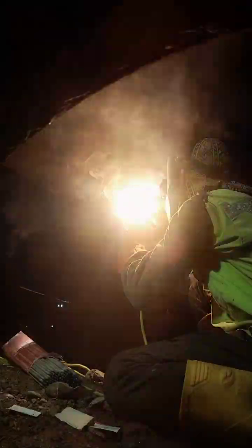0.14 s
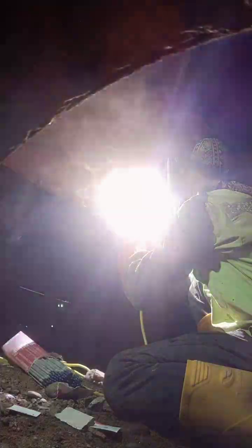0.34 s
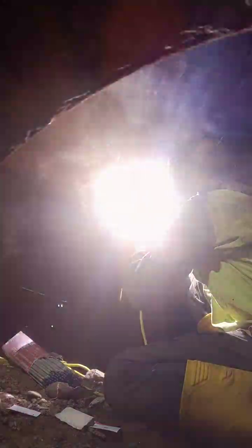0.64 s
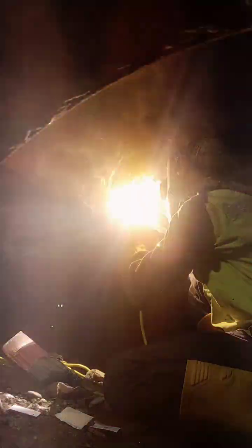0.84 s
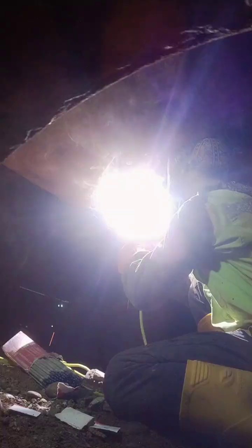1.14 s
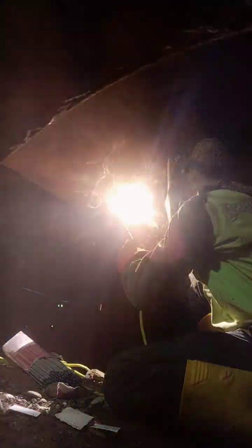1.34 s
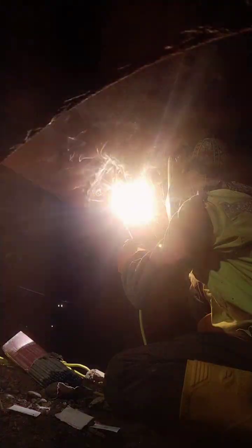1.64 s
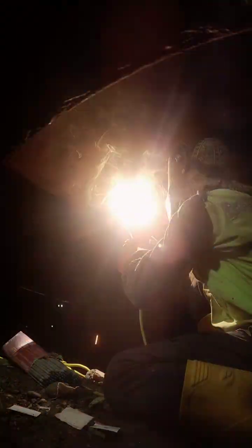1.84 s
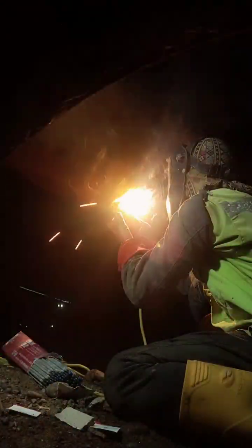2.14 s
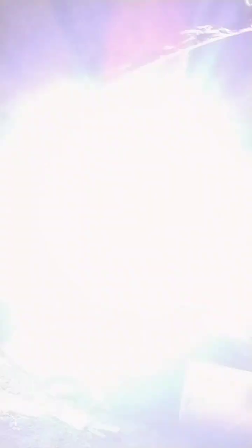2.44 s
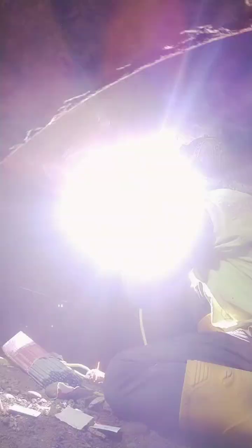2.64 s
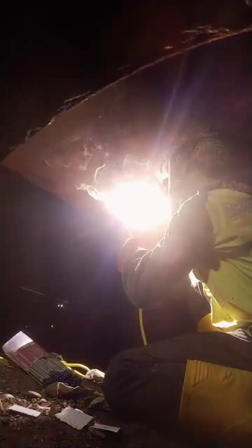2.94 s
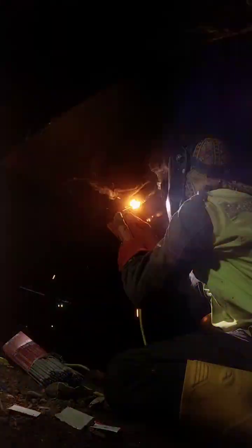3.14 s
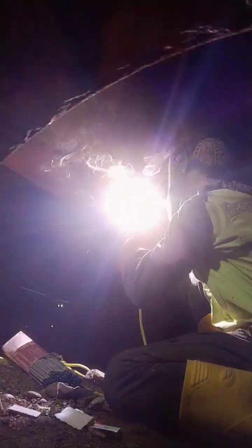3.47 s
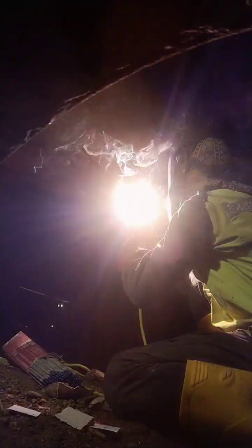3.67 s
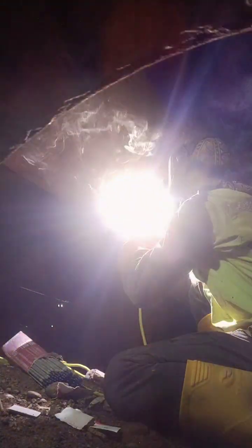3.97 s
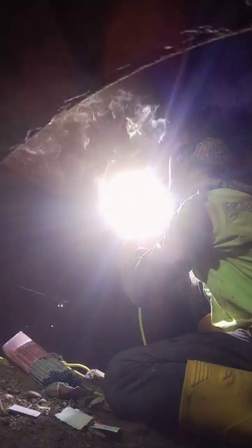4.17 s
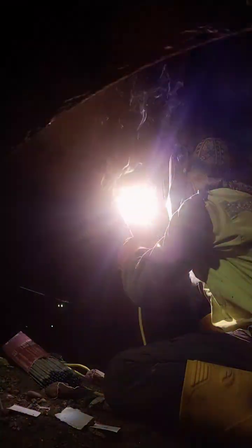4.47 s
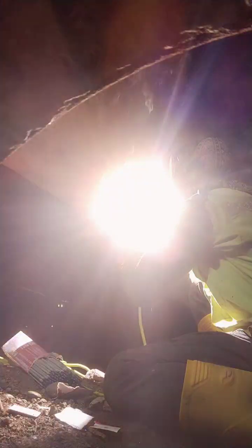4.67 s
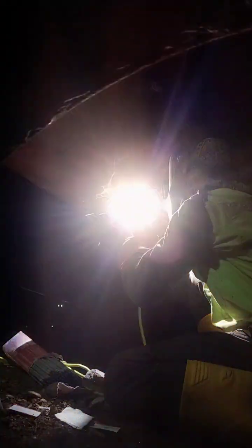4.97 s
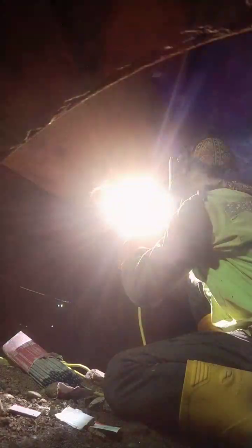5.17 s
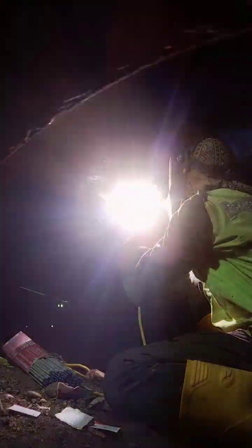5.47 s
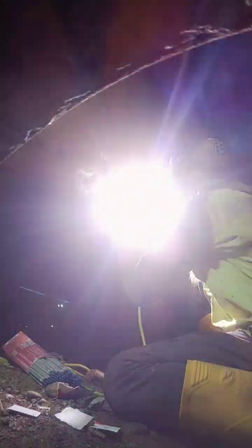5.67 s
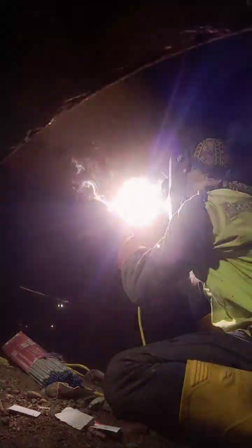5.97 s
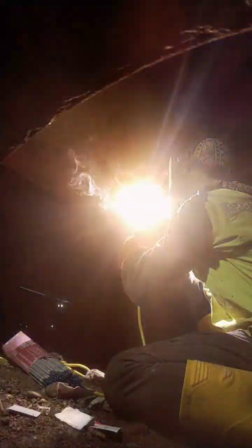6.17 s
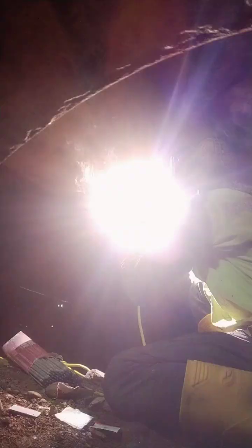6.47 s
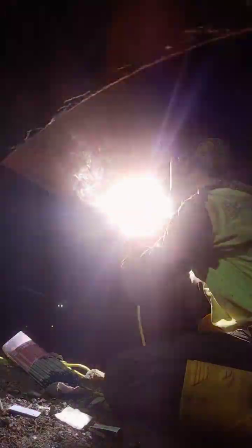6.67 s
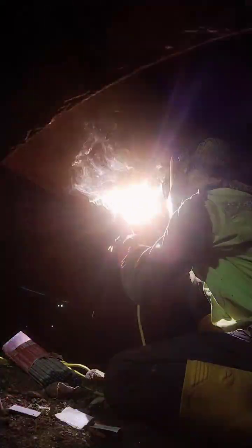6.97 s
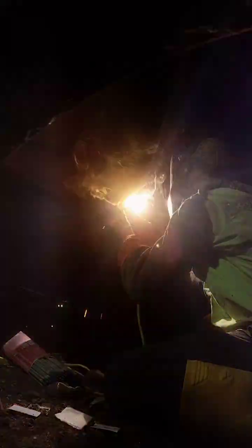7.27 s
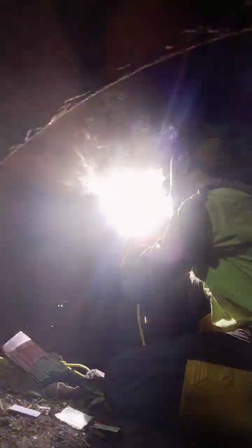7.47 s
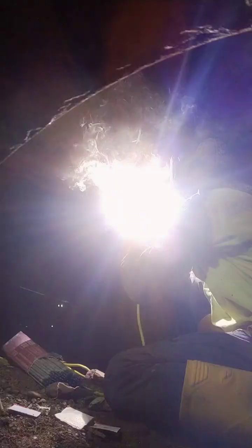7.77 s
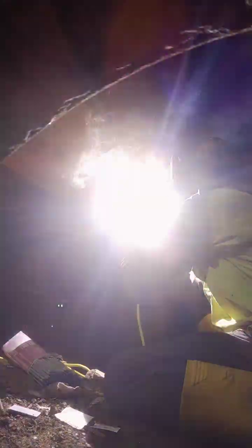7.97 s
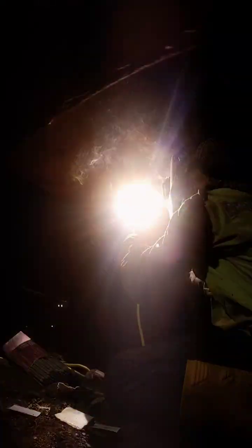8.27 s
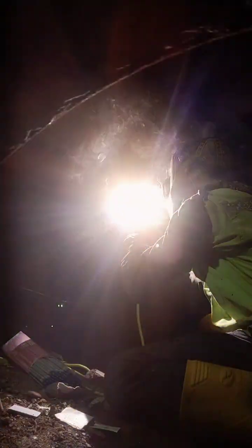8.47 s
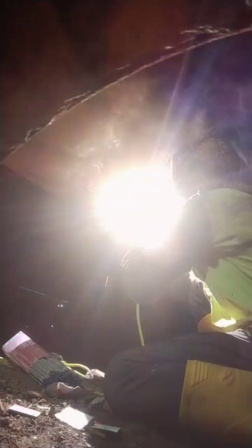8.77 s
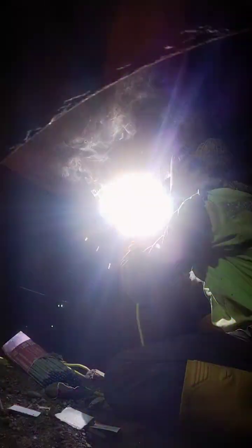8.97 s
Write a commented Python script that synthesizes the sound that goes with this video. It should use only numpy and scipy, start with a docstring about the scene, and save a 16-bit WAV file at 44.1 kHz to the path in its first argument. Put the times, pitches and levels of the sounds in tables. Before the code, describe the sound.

A stick welding arc sizzles and crackles fiercely against a large steel pipe, flaring in bursts with sharp pops over a low hollow rumble.

```python
"""Outdoors, close to a large steel pipe: a stick electrode burns on its seam.
The arc sizzles in countless tiny spatter bursts (shaped noise and clicks) and roars into the hollow
pipe (deeper noise with resonances). A few times a second a molten drop bridges the gap with a pop
(a click, often with a push of air), and most drops choke the arc for a moment. At listed times it
flares up from its simmer. Thin whistles, soft whoomps and a low background complete the scene."""
import sys
import numpy as np
from scipy import signal
from scipy.fft import rfft, irfft
from scipy.io import wavfile
from scipy.ndimage import uniform_filter1d

SR = 44100
rng = np.random.default_rng(int(sys.argv[2]) if len(sys.argv) > 2 else 0)


def bounce(signal):
    """Save signal as a 16-bit WAV file at the path given by the first command-line argument."""
    frames = np.transpose(np.atleast_2d(signal))
    limited = np.clip(frames, -1, 1)
    pcm = np.round(limited * 32767).astype(np.int16)
    wavfile.write(sys.argv[1], SR, pcm)


N = 402191  # length in samples

# The arc simmering between flares, levels before each layer's own trim: start_s, sizzle_db, gas_db
SIMMER_LEVELS = [(0, -40, -57.5), (1.2, -40, -54.5), (1.6, -37, -55.5), (2.3, -43.5, -50.5),
                 (2.8, -36.5, -55.5), (4.4, -41.5, -57.5), (4.8, -36, -52.5), (5.7, -42, -57),
                 (6.3, -37, -55), (7.22, -34.5, -49), (7.33, -41.5, -56.5), (7.7, -39, -54),
                 (8.1, -39, -52), (8.35, -39.5, -52.5), (9.1, -39, -57.5)]
# The arc flaring up, same levels: start_s, length_s, sizzle_db, gas_db, swell_db (from start to end)
ARC_FLARES = [(0, 0.079, -33.5, -46, 6), (.282, 0.081, -32, -46.5, -0.5), (0.461, .088, -35, -49, -1),
              (0.637, .178, -36, -51, 1), (0.942, 0.13, -32.5, -48, 2), (1.264, 0.1295, -35.5, -50.5, 8.5),
              (1.495, .04, -29.5, -45.5, 3.5), (1.621, 0.23, -32, -47.5, 2), (1.975, 0.24, -35, -45, 2.5),
              (2.461, 0.25, -35.5, -51.5, -3.5), (2.833, 0.12, -37, -51, 6.5),
              (3.064, 0.088, -40.5, -54, 9), (3.278, 0.085, -32, -48.5, -3), (3.439, 0.16, -36.5, -53.5, 6),
              (3.722, 0.049, -34, -48, -1), (3.849, 0.064, -36, -52.5, 1), (4.03, 0.079, -33, -49.5, -10.5),
              (4.205, 0.15, -36, -51, -2), (4.557, 0.18, -31.5, -48, 7.5),
              (4.854, 0.098, -30.5, -46.5, -3.5), (5.155, 0.14, -37, -50.5, -7),
              (5.395, 0.13, -37, -52, 3.5), (5.72, 0.11, -33.5, -50, 0.5), (5.921, .036, -37.5, -48.5, 0),
              (6.058, .14, -33.5, -46, -2.5), (6.539, 0.2, -36.5, -50.5, -2.5), (6.83, 0.11, -40, -55, 3.5),
              (7.027, 0.14, -31, -44, 2.5), (7.387, 0.22, -35, -51, 0), (7.824, 0.049, -33, -50.7, 4),
              (7.954, 0.073, -32, -45, -1.5), (8.217, 0.073, -31.5, -48.5, -4.5),
              (8.41, .031, -29.5, -46.5, 11), (8.523, 0.17, -33.5, -47, 6.5),
              (8.813, 0.11, -29.5, -44, 1.5)]
# Drops bursting in the gap: time_s, snap_db, tick_db (treble, before sharpening),
# push_full_scale (start of the slow air swing), choke_db (only values above 0 choke the arc)
DROP_POPS = [(0.0922, -36, -10, 0, 6.5), (0.198, -18.5, -8, 0.00026, 14.5), (0.3752, -24, -4, -0.0012, 2),
             (0.55, -23, -3, -0.0011, 0.5), (0.5795, -22, -1.5, -0.006, 5.5), (0.8132, -29, -8, 0.0021, 3),
             (0.8533, -28, -12, 0, -0.5), (1.0847, -24, -7, -0.0023, 9), (1.4065, -27, -9, -0.00069, 10.5),
             (1.8888, -38, -7.5, 0, 8.5), (2.3816, -32, -4.5, -0.005, 4), (2.7331, -15, -5, 0.067, 14),
             (2.8007, -31, -7, 0.0038, 4), (2.9991, -23, -3.5, 0.005, 6), (3.179, -18, -7, -0.0007, 5),
             (3.367, -13.5, -6, -0.0062, 11.5), (3.6321, -15.5, -4.5, 0.01, 13),
             (3.7695, -35, -4.5, -0.0019, 5), (3.9445, -19, -5.5, 0.0017, 4.5),
             (4.1046, -15.5, -7, 0.021, 15), (4.3727, -32, -7, 0, 4), (4.4697, -19.5, -9, 0.0015, 6.5),
             (4.9754, -26, -6, -0.0018, 3), (5.0692, -9, -7, -0.024, 11), (5.3156, -17, -4.5, 0.025, 11.5),
             (5.5606, -8.5, -4.5, -0.021, 4), (5.6387, -18.5, -8, -0.0021, 3),
             (5.8398, -21, -5, -0.0037, 5), (5.9677, -15.5, -9, 0.01, 12.5), (6.2665, -21, -1, -0.00092, 2),
             (6.452, -16.5, -1.5, 0.00062, 8), (6.7346, -18.5, -7, -0.0083, 16.5), (6.8002, -31, -14, 0, 3),
             (6.9282, -28, -11, 0, 15), (7.6515, -18, -4.5, -0.0012, 6), (7.871, -20, -8, 0.046, 20),
             (8.4424, -12, -18, -0.013, 12.5), (8.72, -17.5, -4.5, -0.0077, 11),
             (8.9613, -22, -2, -0.0044, -5), (9.019, -15, -6.5, -0.011, 9)]
# The loudest bursts of spatter, before sharpening: time_s, energy_db
LOUD_CRACKS = [(0.6379, -7.5), (0.6692, -4), (0.7977, -3), (1.1746, -9), (1.1943, -6.5), (1.3773, -7),
               (1.5228, -4), (1.6295, -5), (1.7667, -5), (1.9939, 1.5), (2.3003, -7), (2.3227, -6),
               (2.637, -5), (2.906, -0.5), (3.075, -8.5), (3.1417, -3), (3.1592, -2), (3.4358, -14),
               (3.6111, -3), (3.7975, -6), (3.9159, -7), (4.038, -13), (4.2904, -3.5), (4.454, -10),
               (4.7025, -1), (4.804, -6), (4.9654, -3), (5.2343, -2), (5.2681, -5.5), (5.4826, -4),
               (5.7327, 0), (5.9526, -3), (6.1865, -6), (6.2063, -5.5), (6.588, 2), (6.8968, -6),
               (7.0802, 4), (7.162, 0), (7.3077, -3.5), (7.5822, -2.5), (7.6421, -2.5), (7.7353, -5.5),
               (7.8223, -8), (8.0055, -4), (8.125, -7), (8.2442, -3), (8.3183, -1.5), (8.6958, -2),
               (8.839, 2), (8.9375, -5)]
# Thin whistles driven by the arc, before flutter: start_s, length_s, pitch_hz, level_db (against the sizzle)
ARC_WHISTLES = [(0.93, 0.34, 4130, -14.5), (1.22, 0.26, 4180, -22), (1.335, 0.24, 3390, -14.5),
                (1.6, 0.3, 3420, -25), (1.3, 0.6, 4360, -24), (1.95, 0.3, 4405, -22)]
# Gas whoomps as the arc lights again, before roughness and smoothing:
# start_s, pressure_full_scale, length_s
GAS_WHOOMPS = [(2.88, -0.12, 0.078), (7.95, -0.09, 0.15), (7.973, -0.095, 0.03)]

# Tone colours. Only the differences between levels matter, because shaped() sets the loudness.
# Sizzle: pitch_hz, level_db (per Hz)
SIZZLE_COLOUR = [(300, -38.5), (2300, -31.5), (4000, -17), (6800, -27.5), (7600, -13.5), (8300, -16),
                 (8900, -26), (10200, -22.7), (12400, -14.5), (14000, -12.5), (15400, 0.5), (16000, -7.5)]
# Peaks and notches that the nearby steel puts into the sizzle: pitch_hz, width_hz, height_db
STEEL_REFLECTIONS = [(2336, 99, 4.5), (2918, 169, 4.4), (3060, 116, -7.8), (3413, 64, 6.5),
                     (3481, 50, -6.0), (3719, 304, -10.8), (4429, 197, -9.3), (5246, 95, -4.1),
                     (6105, 399, 7.9), (6129, 117, -11.0), (6766, 212, 7.4), (6959, 50, -7.3),
                     (7188, 64, -4.1), (8645, 67, -4.7), (9287, 57, -4.7), (9554, 294, 6.0),
                     (9725, 160, -8.0), (10082, 111, -10.6), (10679, 93, -9.4), (10909, 164, 4.9),
                     (11536, 201, -5.9), (12688, 143, 4.9), (12943, 114, -5.5), (13400, 118, -6.4),
                     (13851, 62, -4.2), (14536, 75, -4.6)]
# Roar of the gas: pitch_hz, level_db (per Hz)
ROAR_COLOUR = [(60, -8.5), (200, -14), (290, -3), (470, 1.5), (700, -1), (1000, -4.5), (1500, -12.5),
               (2500, -16.5), (6000, -22.5)]
# Rumble in the pipe: pitch_hz, level_db (per Hz)
RUMBLE_COLOUR = [(10, -7.5), (30, 1.5), (60, -2.5), (110, -7.5), (165, -11.5), (235, -12.5), (280, -26.5),
                 (1000, -50.5)]
# Air resonances of the pipe: pitch_hz, width_hz, height_db
PIPE_RESONANCES = [(33, 10, 4), (52, 8, 5), (70, 7, 5), (86, 14, -3), (104, 9, 8), (126, 10, 3),
                   (186, 12, 3)]
# Snap of a drop: pitch_hz, level_db (per Hz)
SNAP_COLOUR = [(60, 7), (300, -3.5), (800, -0.5), (1700, 1), (2800, -0.5), (4200, -7), (6000, -20),
               (12000, -20)]
# Steady background of the site: pitch_hz, level_db (per Hz)
SITE_COLOUR = [(10, -18), (35, 3.5), (100, -8), (200, -11), (300, -22.5), (700, -26.5), (2000, -36),
               (8000, -41), (16000, -72)]

SITE_DB = -56  # background loudness
CUTOFF_HZ = 15850  # top of the treble
FLASH_DB, FLASH_S = 2, 0.079  # every flare lights with a brief overshoot
RECOVER_S = 0.11  # time the arc needs to come back after a drop has choked it
GAS_CHOKE_SHARE = 0.76  # the gas roar sinks less than the sizzle
DROP_SHORT_S, DROP_SHORT_DB = 0.0083, -7.5  # a drop shorts the arc just before it bursts
TIME = np.arange(N) / SR  # seconds
GRID_HZ = np.maximum(np.arange(16385) * SR / 32768, 1)


def from_db(db):
    """Turn decibels into a gain."""
    return 10 ** (np.asarray(db) / 20)


def colour(spectrum, resonances=()):
    """Gain over frequency: a broad shape with peaks and notches on it."""
    hz, db = np.transpose(spectrum)
    shape_db = np.interp(np.log(GRID_HZ), np.log(hz), db)
    for centre_hz, width_hz, height_db in resonances:
        offset = 2 * (GRID_HZ - centre_hz) / width_hz
        shape_db = shape_db + height_db / (1 + offset ** 2)
    return from_db(shape_db)


def shaped(x, gain, band):
    """Filter that never sounds early (minimum phase); unit white noise gets rms 1 inside the band (Hz)."""
    inside = (GRID_HZ > band[0]) & (GRID_HZ < band[1])
    band_rms = np.sqrt(np.mean(gain ** 2 * inside))
    # folding the cepstrum packs the response as early as possible
    cepstrum = irfft(np.log(gain / band_rms))
    half = len(cepstrum) // 2
    cepstrum[1:half] *= 2
    cepstrum[half + 1:] = 0
    response = irfft(np.exp(rfft(cepstrum)))[:half]
    return signal.fftconvolve(x, response)[:N]


def lag(x, seconds):
    """Smoothing: the output follows the input with a delay, like a sluggish needle."""
    keep = np.exp(-1 / (seconds * SR))
    return signal.lfilter([1 - keep], [1, -keep], x + 1e-18)


def drift(rate):
    """Slow random wander with spread 1, heading for a new value `rate` times a second."""
    knots = rng.standard_normal(4096)
    wander = np.interp(TIME * rate, np.arange(len(knots)), knots)
    return wander * np.sqrt(3 / 2)  # makes up for the spread lost between knots


def clicks(times, heights):
    """One single-sample impulse per event."""
    out = np.zeros(N)
    places = np.clip(np.round(times * SR).astype(int), 0, N - 1)
    np.add.at(out, places, heights)
    return out


def sharpen(x, amount):
    """Lean a sound to the treble by subtracting part of the previous sample."""
    return signal.lfilter([1, -amount], [1 + .8 * amount], x)


def just_before(events, seconds):
    """1 during the moment that leads up to each event, else 0."""
    gate = np.zeros(N)
    for s, *_ in events:
        gate[max(int((s - seconds) * SR), 0):max(int(s * SR), 0)] = 1
    return gate


def arc_state(settle_s=0.001):
    """Gains of sizzle and gas: the arc simmers, flares, is shorted by drops and choked by most of them."""
    s, sizzle_db, gas_db = np.transpose(SIMMER_LEVELS)
    sizzle_db, gas_db = np.interp(TIME, s, sizzle_db), np.interp(TIME, s, gas_db)

    choke_db = np.zeros(N)
    for s, *_, depth_db in DROP_POPS:
        after = slice(int(s * SR), int((s + 3 * RECOVER_S) * SR))
        recovering = np.exp(-((TIME[after] - s) / RECOVER_S) ** 2)
        choke_db[after] = np.maximum(choke_db[after], depth_db * recovering)
    sizzle_db = sizzle_db - choke_db
    gas_db = gas_db - GAS_CHOKE_SHARE * choke_db

    # a flare replaces the simmer and any choking
    for s, length, flare_sizzle_db, flare_gas_db, swell_db in ARC_FLARES:
        burning = (TIME >= s) & (TIME < s + length)
        age = TIME[burning] - s
        shape_db = swell_db * (age / length - .5) + FLASH_DB * np.exp(-age / FLASH_S)
        sizzle_db[burning] = flare_sizzle_db + shape_db
        gas_db[burning] = flare_gas_db + shape_db

    short_db = DROP_SHORT_DB * just_before(DROP_POPS, DROP_SHORT_S)
    sizzle_level = lag(from_db(sizzle_db + short_db), settle_s)
    gas_level = lag(from_db(gas_db + GAS_CHOKE_SHARE * short_db), settle_s)
    return sizzle_level, gas_level


def spatter(per_s=480, spread_db=4.0, burst_s=0.00041, clump_db=3.5, even_s=0.0434):
    """Power of the tiny bursts, mean about 1: clumped, each swelling and dying in about a millisecond."""
    born = rng.random(N) < per_s / SR
    own_size_db = spread_db * np.clip(rng.standard_normal(N), -2, 2)
    sizes = from_db(own_size_db + clump_db * drift(90))
    power = lag(lag(born * sizes ** 2, burst_s), burst_s)
    # dividing by the running average keeps the overall level even
    return power / (uniform_filter1d(power, int(even_s * SR)) + 1e-9)


def puffing_noise(level, bursts, spatter_share):
    """Noise of moving gas: one share of its power follows the spatter, the rest is steady."""
    power = 1 - spatter_share + spatter_share * bursts
    return level * np.sqrt(power) * rng.standard_normal(N)


def sizzle(level, bursts, fry_db=-0.8, suddenness=0.48, spark_per_s=70, spark_db=18.3,
           scatter_db=-6.5, scatter_s=0.0017):
    """Frying, sparks, cracks and the ticks of the drops leave the same spot and glance off the pipe."""
    frying = puffing_noise(level, bursts, spatter_share=0.75)
    # sparks are single sharp snaps, most likely while the spatter is thick
    born = rng.random(N) < spark_per_s * bursts / SR
    sparks = level * born * from_db(spark_db)
    s, energy_db = np.transpose(LOUD_CRACKS)
    cracks = clicks(s, from_db(energy_db) * rng.choice([-1, 1], len(s)))
    s, _, tick_db, _, _ = np.transpose(DROP_POPS)
    ticks = clicks(s, from_db(tick_db))
    direct = from_db(fry_db) * frying + sharpen(sparks + cracks + ticks, suddenness)
    # ground, welder and pipe wall scatter a short diffuse tail
    scattered = np.sqrt(lag(direct ** 2, scatter_s)) * rng.standard_normal(N)
    mixed = direct + from_db(scatter_db) * scattered
    return shaped(mixed, colour(SIZZLE_COLOUR, STEEL_REFLECTIONS), band=(5000, CUTOFF_HZ))


def roar(level, bursts, spatter_share=0.27, roar_db=-2.08):
    """Hot gas puffs out with the spatter, heard as noise in the midrange."""
    puffs = from_db(roar_db) * puffing_noise(level, bursts, spatter_share)
    return shaped(puffs, colour(ROAR_COLOUR), band=(250, 1500))


def rumble(level, bursts, spatter_share=0.63, rumble_db=9.5):
    """The heaving plume stirs the air in the pipe, which resonates at its own low pitches."""
    heaves = from_db(rumble_db) * puffing_noise(level, bursts, spatter_share)
    return shaped(heaves, colour(RUMBLE_COLOUR, PIPE_RESONANCES), band=(45, 250))


def site():
    """Low, even background rumble made of steady noise."""
    return from_db(SITE_DB) * shaped(rng.standard_normal(N), colour(SITE_COLOUR), band=(20, 16000))


def pops(small_db=-18.5, thin_hz=700, kick=3.14, kick_s=0.00055, swing_hz=4.91, recover_s=0.22):
    """A drop snaps; many also shove the air, a sharp kick and a pressure step that swings slowly back."""
    s, snap_db, _, step, _ = np.transpose(DROP_POPS)
    # the smaller the drop, the less bass its snap has
    small = np.clip(.5 + (small_db - snap_db) / 10, 0, 1)
    heights = from_db(snap_db)
    bass = lag(clicks(s, small * heights), 1 / (2 * np.pi * thin_hz))
    snaps = clicks(s, heights) - bass
    sharp_kick = kick * np.exp(-TIME / kick_s)
    slow_swing = np.exp(-TIME / recover_s) * np.cos(2 * np.pi * swing_hz * TIME)
    shoves = signal.fftconvolve(clicks(s, step), sharp_kick + slow_swing)[:N]
    return shoves + shaped(snaps, colour(SNAP_COLOUR), band=(900, 3000))


def spits(snap_db=-37.0, growth=0.32):
    """Every loud burst of spatter carries a faint snap of its own in the midrange."""
    s, energy_db = np.transpose(LOUD_CRACKS)
    snaps = clicks(s, from_db(snap_db + growth * energy_db))
    return shaped(snaps, colour(SNAP_COLOUR), band=(900, 3000))


def whistles(level, waver_hz=6.7, flutter_db=1.0):
    """Thin, wavering sine tones swell and fade, and rise and fall with the arc that drives them."""
    out = np.zeros(N)
    for s, length, hz, db in ARC_WHISTLES:
        progress = np.clip((TIME - s) / length, 0, 1)
        swell = np.sqrt(np.abs(np.sin(np.pi * progress)))
        phase = 2 * np.pi * np.cumsum(hz + waver_hz * drift(60)) / SR
        out += swell * from_db(db + flutter_db * drift(51)) * np.sin(phase)
    return level * out


def whoomps(rough=0.074, rise_s=0.0034):
    """A ragged push of air, as the arc lights again, that dies away."""
    push = np.zeros(N)
    for s, height, length in GAS_WHOOMPS:
        push += height * (TIME > s) * np.exp(-((TIME - s) / length) ** 2)
    return lag(push * (1 + rough * drift(170)), rise_s)


def scene():
    """The arc and its drops over the background, as one channel."""
    sizzle_level, gas_level = arc_state()
    bursts = spatter()
    arc = sizzle(sizzle_level, bursts) + roar(gas_level, bursts) + rumble(gas_level, bursts)
    events = pops() + spits() + whistles(sizzle_level) + whoomps()
    return (arc + site() + events)[None]


def record(dry):
    """Cut the top steeply with a short filter, so that clicks stay crisp."""
    low_pass = signal.firwin(301, CUTOFF_HZ, fs=SR)
    return signal.fftconvolve(dry, low_pass[None], mode="same")


dry = scene()
out = record(dry)
bounce(out)
```